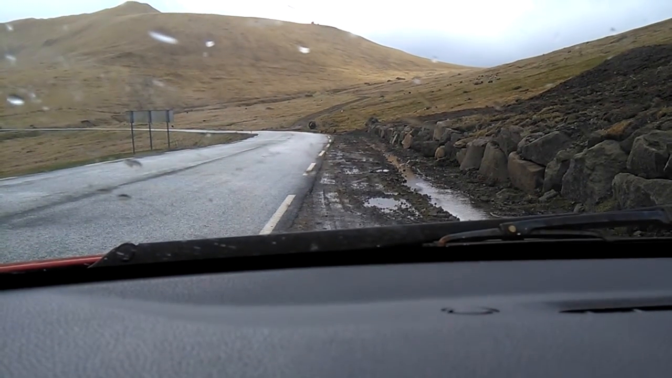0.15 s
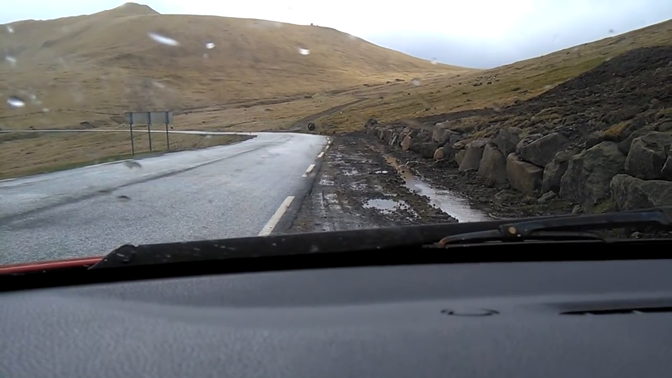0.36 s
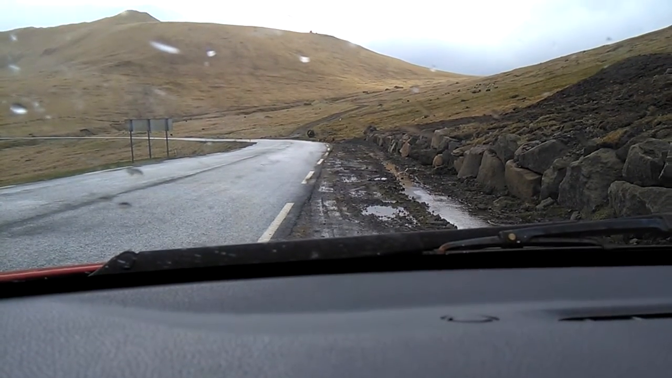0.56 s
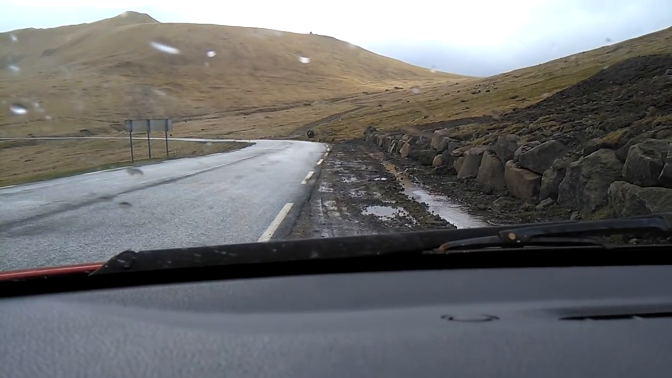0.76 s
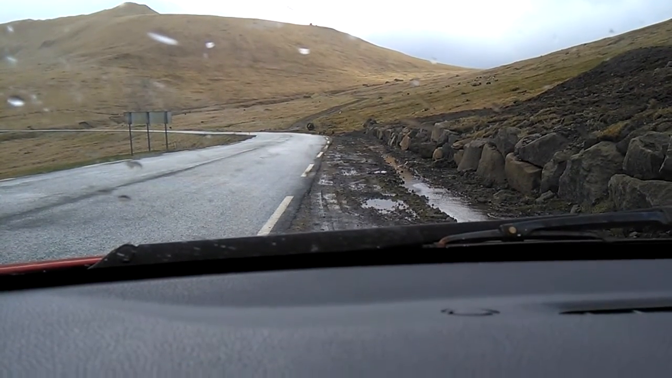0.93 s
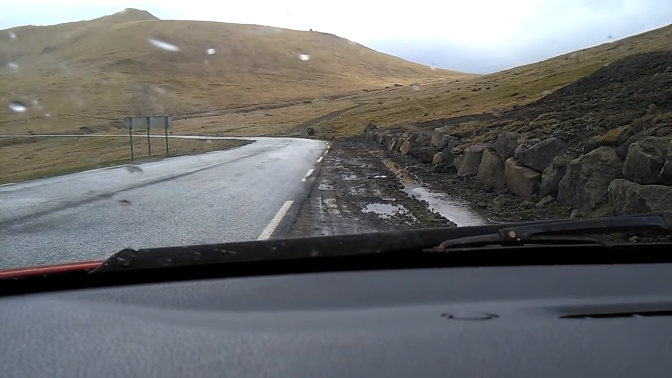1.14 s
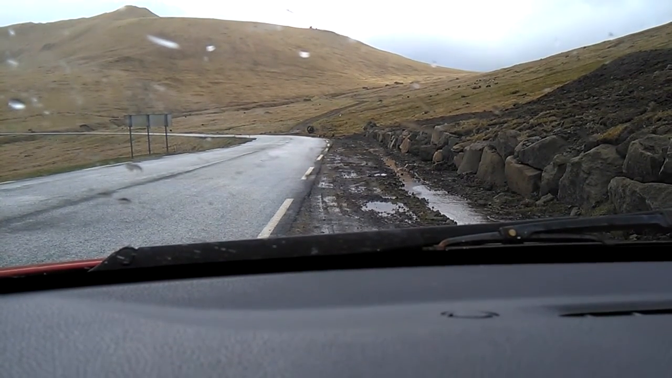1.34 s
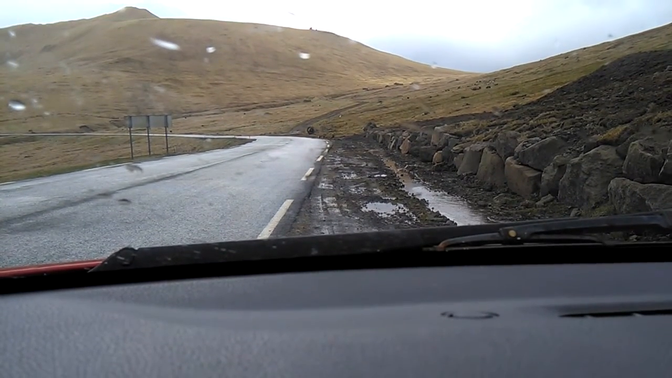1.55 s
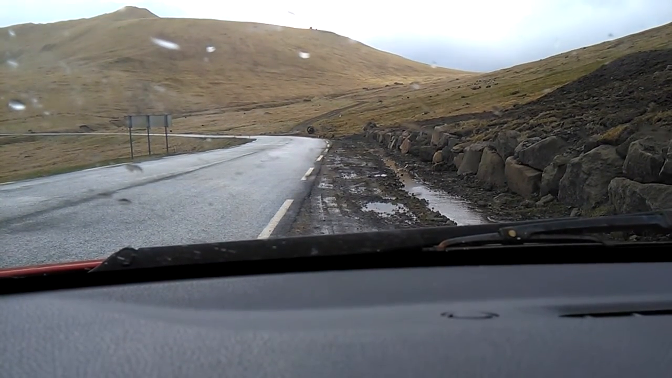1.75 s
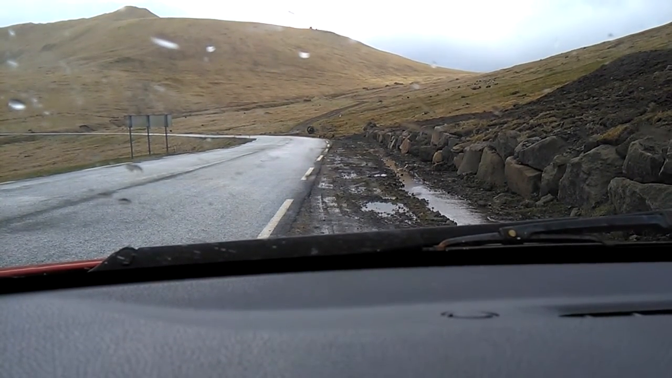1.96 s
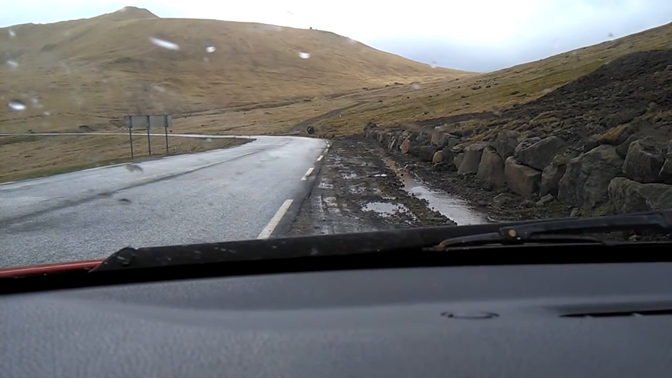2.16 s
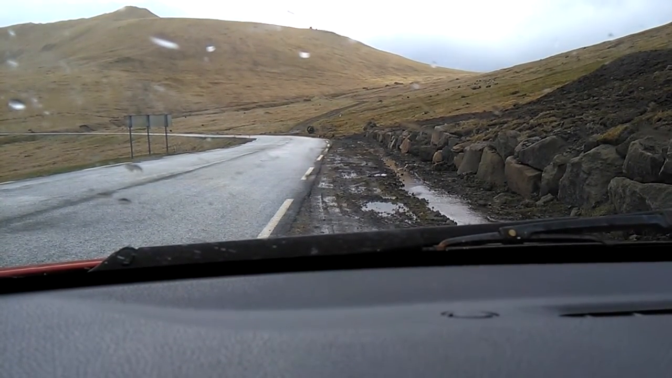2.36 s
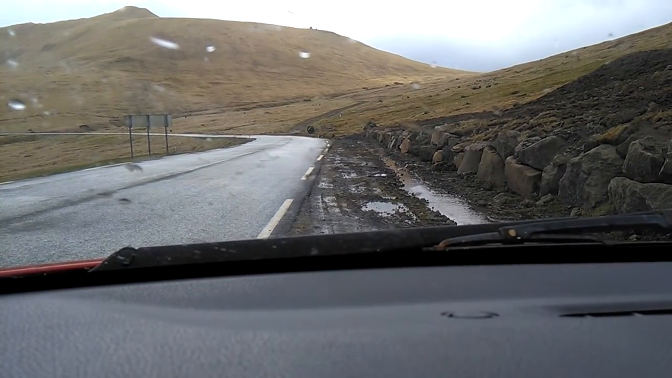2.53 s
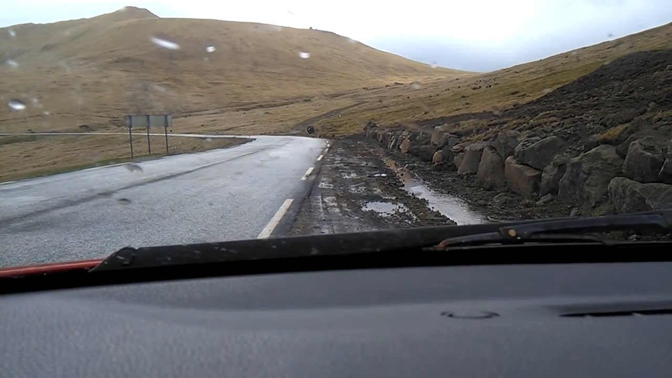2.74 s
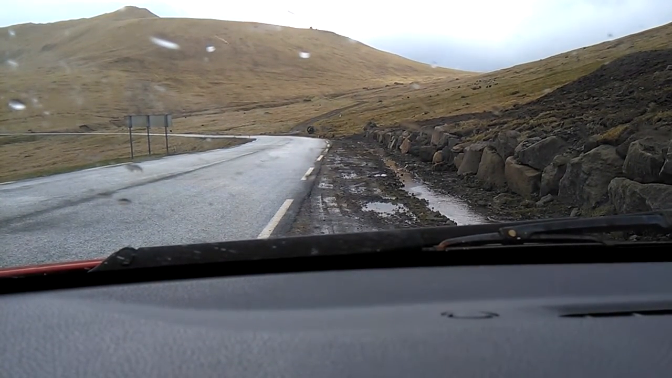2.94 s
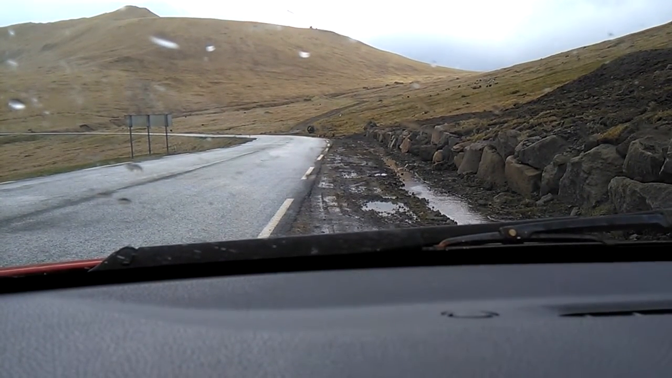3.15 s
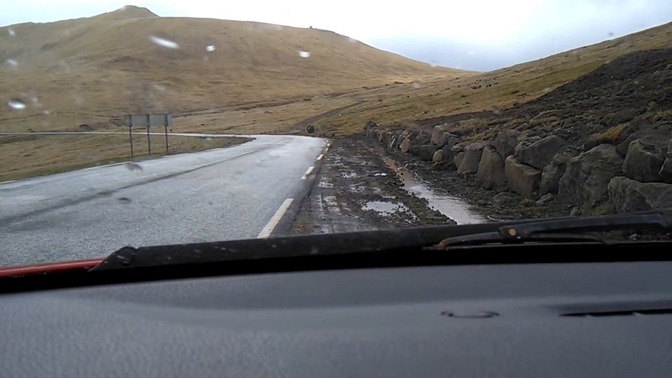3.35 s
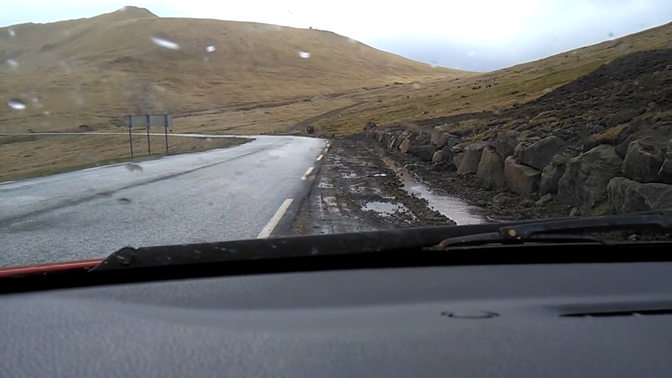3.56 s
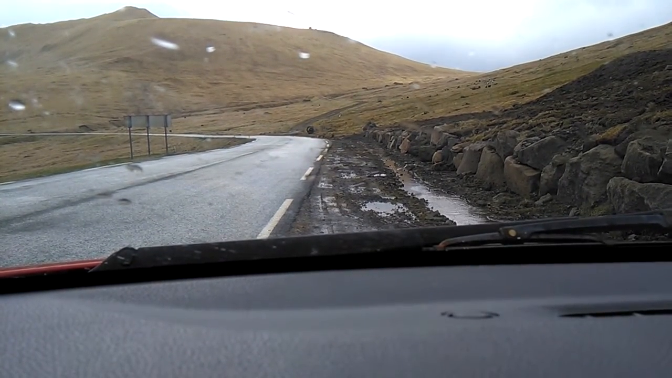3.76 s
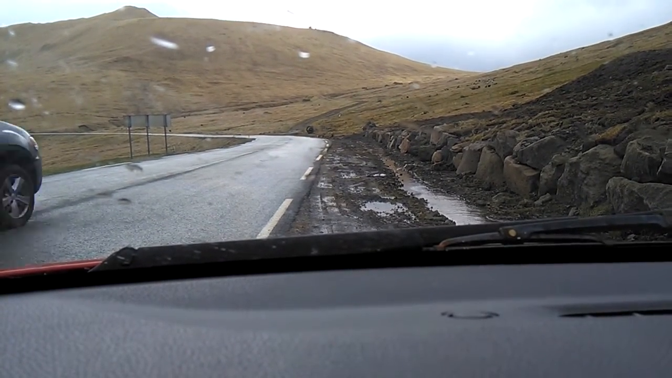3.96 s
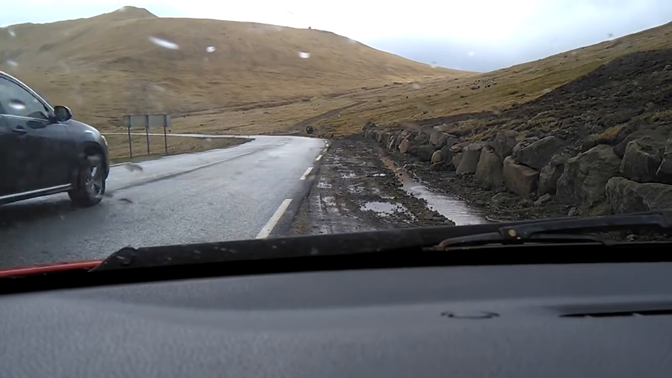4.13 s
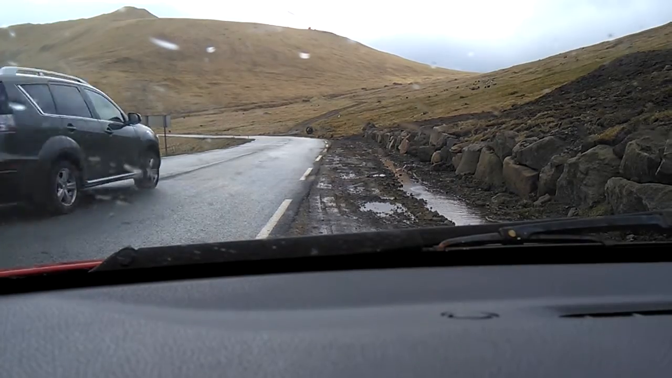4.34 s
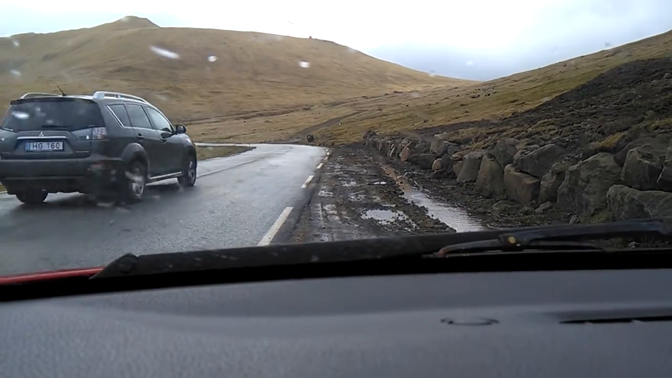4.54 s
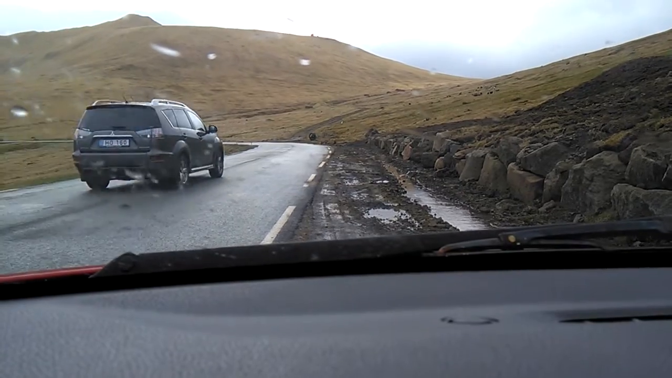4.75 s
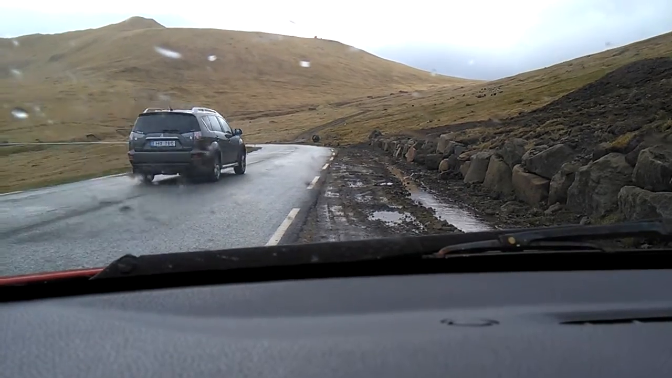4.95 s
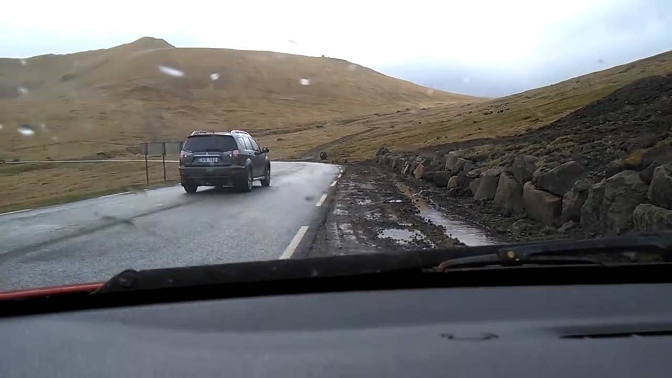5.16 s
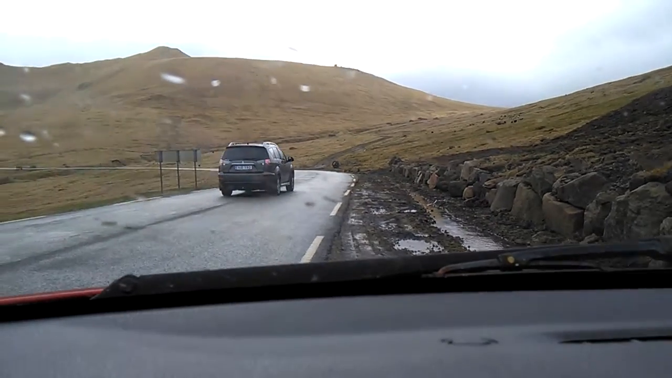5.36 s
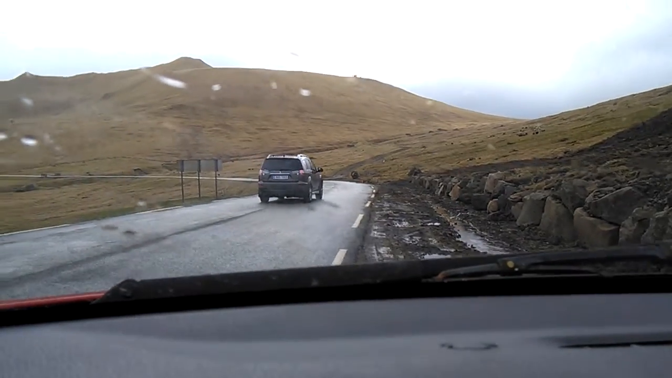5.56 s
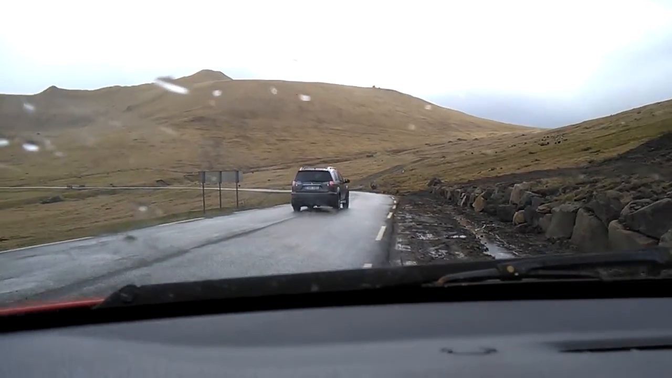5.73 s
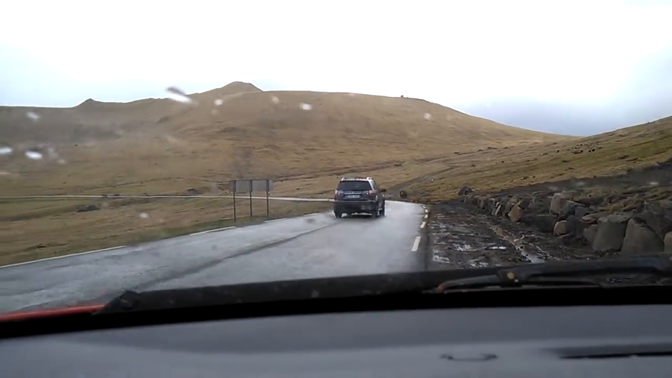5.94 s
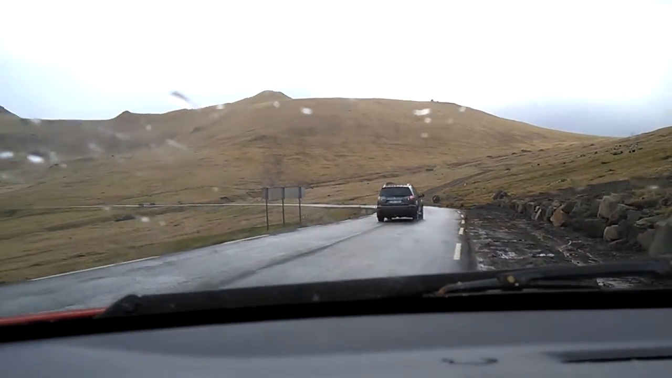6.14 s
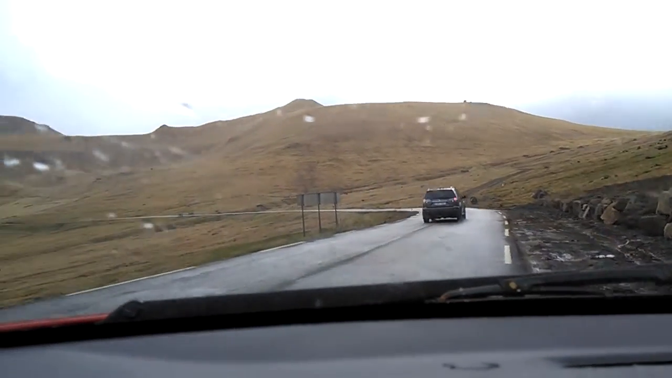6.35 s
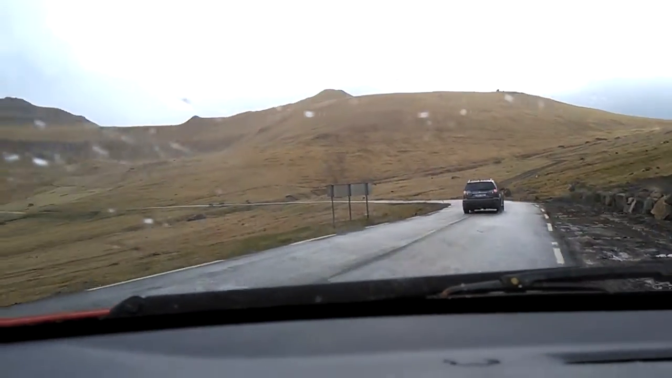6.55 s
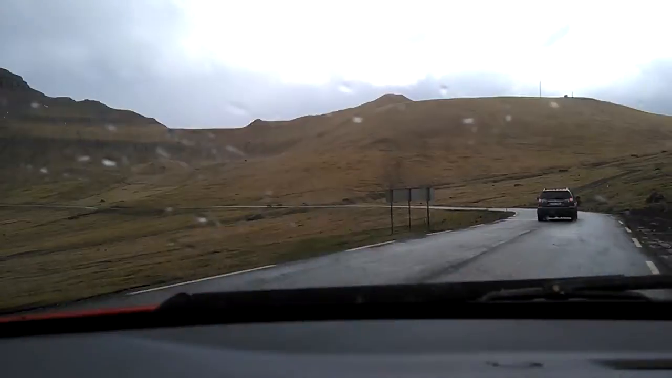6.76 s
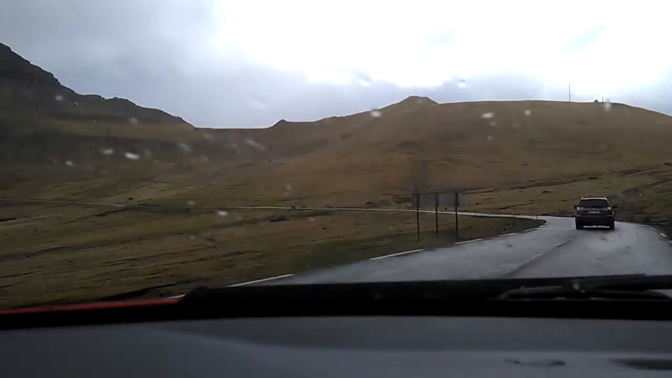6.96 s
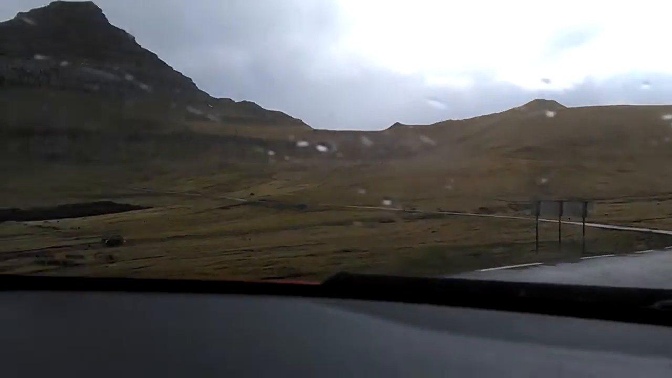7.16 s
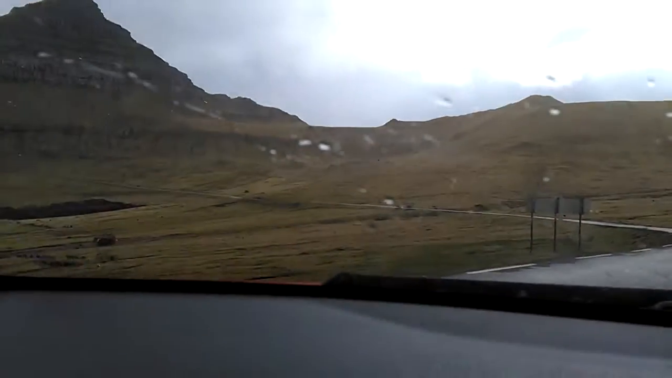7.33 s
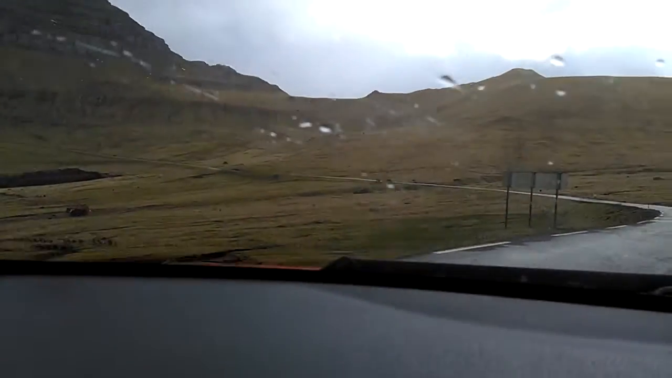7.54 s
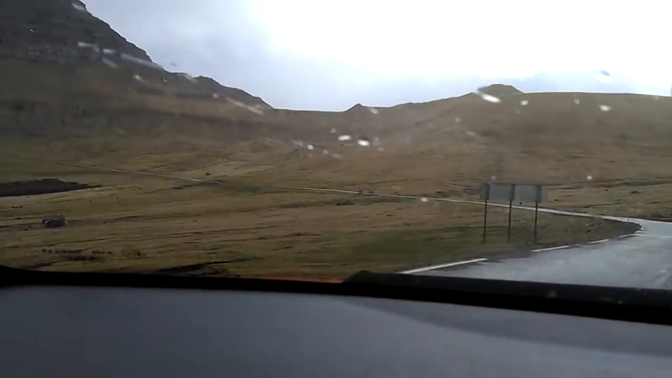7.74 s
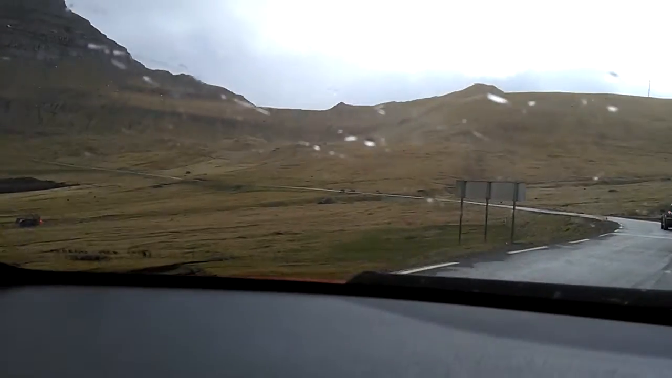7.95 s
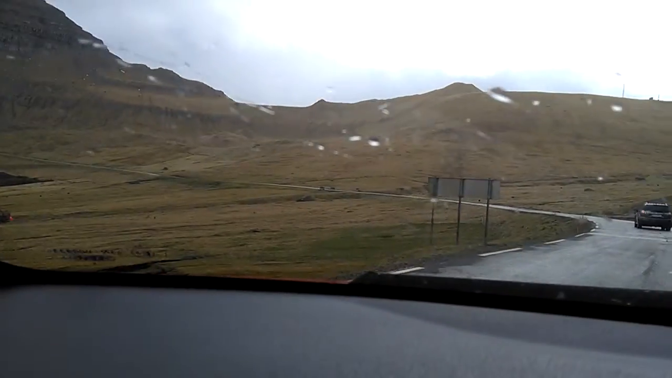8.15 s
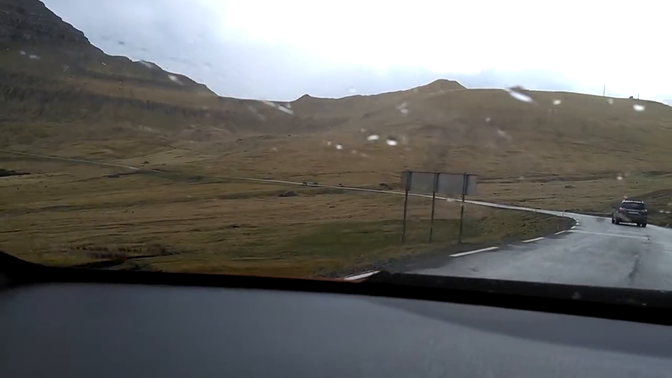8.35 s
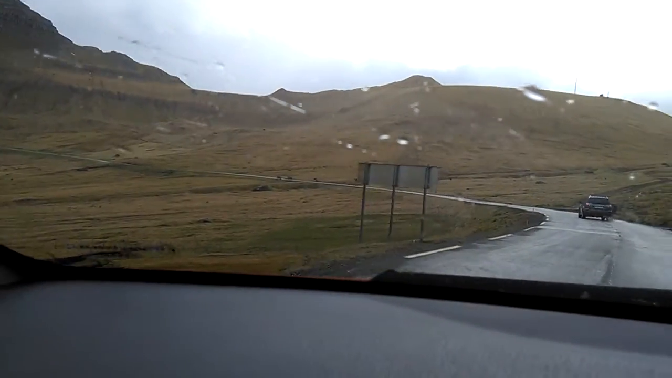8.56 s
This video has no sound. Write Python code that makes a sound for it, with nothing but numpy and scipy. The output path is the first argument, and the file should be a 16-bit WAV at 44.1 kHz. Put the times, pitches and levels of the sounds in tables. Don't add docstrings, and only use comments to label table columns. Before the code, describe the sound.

Heard inside a car by a small hand-held microphone: quiet low idle, soft fan air and an indicator alternating bright ticks and duller tocks. A few bumps and sleeve rustles come first, another car swishes softly past, then the engine deepens and the car pulls out. The ticking stops amid clicks and a hand rub; road rumble grows and a loose panel buzzes.

```python
import sys
import numpy as np
from scipy import signal
from scipy.fft import rfft, irfft
from scipy.io import wavfile
from scipy.ndimage import uniform_filter1d

SR = 44100
rng = np.random.default_rng(int(sys.argv[2]) if len(sys.argv) > 2 else 0)


def boost(x):
    u = np.asarray(x, float) / 20
    return 10 ** u


def generate_wav(sig):
    pcm = np.round(np.clip(np.atleast_2d(sig).T, -1, 1) * 32767).astype(np.int16)
    wavfile.write(sys.argv[1], SR, pcm)


N = 379260
T = np.arange(N) / SR
TOP_HZ = 14250
HEAVE_MID_DB = -36
BUZZ_HZ = 645.3

# time in seconds, firing rate in Hz, then levels in dB of the firing tone,
# of the overtones and of the rocking of the block.
ENGINE_STATE = [(.75, 39.02, -54, -64, -60), (1.2, 37.64, -52, -68, -62), (2.5, 38.9, -49, -67, -64),
                (4.2, 39.1, -62, -53, -63), (4.6, 53.13, -38, -48, -45), (4.8, 58.36, -32, -43, -37.5),
                (5.05, 59.2, -28.5, -43, -36.5), (5.27, 55.95, -24, -37, -37), (5.7, 46, -38, -58, -43),
                (5.95, 47.23, -25.5, -41, -38), (6.3, 49.05, -24.5, -48, -43), (6.8, 46.47, -28, -42, -40),
                (7.0, 47.74, -23, -38.5, -36), (7.13, 50.41, -23, -33.5, -44),
                (7.25, 53.04, -22.5, -31.5, -50), (7.6, 57.27, -27, -34.5, -54),
                (7.8, 60.9, -23.5, -49, -50), (8.15, 63.5, -32, -48.5, -51), (8.6, 69, -31, -45.5, -49)]
# time in seconds, suspension heave in dB, gravel under the tyres in dB.
DRIVING = [(0, -51.5, -54), (1, -48, -54), (2.5, -42.5, -48), (3.1, -45, -48), (4.2, -41, -47),
           (4.6, -38.5, -42), (5.3, -32, -39), (5.75, -35.5, -39.5), (6.2, -32.5, -38), (6.7, -28.5, -40),
           (7.2, -30, -41), (8, -28, -42.5), (8.4, -29, -38.5), (8.6, -29.5, -43)]
# time in seconds, peak in dB.
PANEL_KNOCKS = [(7.838, -42), (7.89, -45), (8.077, -33.5), (8.109, -43), (8.164, -36.5), (8.215, -45),
                (8.264, -42), (8.3, -41), (8.349, -36), (8.374, -34), (8.414, -36), (8.47, -40),
                (8.52, -44), (8.56, -43)]


def curves(table):
    s, *columns = np.transpose(table)
    return [np.interp(T, s, c) for c in columns]


def noise():
    return rng.standard_normal(N)


def unit(x):
    return x / np.sqrt(np.mean(x ** 2))


def colour(x, points, lo_hz, hi_hz, order=8):
    hz = np.fft.rfftfreq(len(x), 1 / SR) + 1
    f, db = np.transpose(points)
    edges = 1 / np.sqrt((1 + (lo_hz / hz) ** order) * (1 + (hz / hi_hz) ** order))
    shape = boost(np.interp(np.log(hz), np.log(f), db))
    return unit(irfft(rfft(x) * shape * edges, len(x)))


def band(x, hz, width):
    return signal.lfilter(*signal.iirpeak(hz, hz / width, fs=SR), x)


def steep(x, hz, width):
    return unit(band(band(x, hz, width), hz, width))


def grit(size, rough_db):
    catch = np.minimum(rng.exponential(size=size), 5)
    return rng.standard_normal(size) * boost(rough_db * catch)


def walk(rate):
    k = int(SR / rate)
    held = np.repeat(rng.standard_normal(N // k + 1), k)
    return unit(uniform_filter1d(uniform_filter1d(held, k), k)[:N])


def swells(s, db, rise, fall):
    t = T[::64, None] - s
    slope = np.where(t < 0, t / np.maximum(rise, .01), -t / np.maximum(fall, .01))
    power = np.sum(boost(2 * (db + 20 * slope)), axis=1)
    return np.interp(T, T[::64], np.sqrt(power))


def add(out, s, x):
    i = max(int(s * SR), 0)
    out[i:i + len(x)] += x[:len(out) - i]


def engine():
    orders = (2, 5, 6, 7, 8, 9, 10, 12, 15, 18, 21, 22)
    # level in dB of the matching partial, relative to the overtones.
    orders_db = [-8, -16, 1, -17, -14, -2, -15, -17, -21, -20, -20, -17]
    # frequency in Hz, lift of a partial crossing it in dB.
    door_lift = [(125, 0), (150, 5), (180, 8), (196, -2), (260, 0.5)]
    # time in seconds, peak in dB, rise and fall in seconds.
    whine_swells = [
        (7.79, -55, 0.11, 0.33),
        (7.94, -58, .3, .25),
        (8.28, -64, .4, 0.41),
        (8.58, -56, 0.092, .1),
        (8.13, -56.5, 0.084, 0.41),
        (8.4, -56, 0.18, 0.083),
        (8.52, -47.5, 0.041, .09),
    ]
    firing_hz, tone_db, over_db, rock_db = curves(ENGINE_STATE)
    shaft_hz = firing_hz / 3
    turn = 2 * np.pi * np.cumsum(shaft_hz * (1 + .0015 * walk(6))) / SR

    def partial(k, db):
        return boost(db + 1.1 * walk(5)) * np.sin(k * turn + rng.uniform(0, 6.4) + .3 * walk(4.6))

    def doors_db(k):
        return np.interp(k * shaft_hz, *np.transpose(door_lift))

    tone = boost(tone_db + 1.2 * walk(9)) * np.sin(3 * turn)
    over = boost(over_db) * sum(partial(k, db + doors_db(k)) for k, db in zip(orders, orders_db))
    rocking = partial(4, rock_db)
    idle = np.interp(firing_hz, (40, 44), (1, 0)) * (partial(7.5, -56) + partial(13.5, -54))

    strain = np.clip((firing_hz - 36) / 24, 0, 1)
    whine_db = np.interp(firing_hz, (39.5, 41), (-62.5, -80))
    size = boost(whine_db) + swells(*np.transpose(whine_swells))
    whine = size * boost((1.5 + strain) * walk(14)) * np.sin(45 * turn + (.2 + .6 * strain) * walk(30))
    return np.sqrt(2) * (tone + over + rocking + idle + whine)


def jolts(hz):
    # time in seconds, peak in dB, centre in Hz, dying away in seconds.
    jolt_rows = [(.01, -38, 100.3, 0.11), (.26, -36.5, 60, 0.14), (.58, -35, 110, 0.087),
                 (.72, -35.5, 60, .15), (.6, -31.5, 170, 0.11), (1.66, -41, 60, 0.13),
                 (1.67, -37, 164, 0.3), (1.8, -32, 149, 0.043), (2.3, -38.5, 165, 0.25),
                 (2.56, -45, 144, 0.37), (2.8, -33.5, 165, 0.16), (3.28, -30.5, 180, 0.048),
                 (3.33, -28, 70.3, 0.36), (3.69, -37.5, 95, 0.086), (3.83, -27, 48.3, 0.18),
                 (4.12, -32.5, 55, 0.18), (4.3, -35.5, 147, 0.46), (4.7, -30.5, 55, 0.21),
                 (5, -36, 40.04, .3), (4.92, -33, 185, 0.19), (6.36, -37.5, 270, .15), (5.3, -27, 70, 0.2),
                 (5.56, -25.5, 55.06, 0.17), (5.861, -28.5, 164.6, 0.14), (6.18, -33, 164.7, 0.27),
                 (6.47, -34, 128.9, 0.17), (6.65, -34, 30, 0.15), (6.87, -24.5, 95, 0.099),
                 (7.05, -18, 55, 0.23), (7.15, -28, 150, 0.24), (6.4, -34, 150, 0.17),
                 (8.15, -40, 342, 0.14), (8.38, -30.5, 165, 0.37)]
    s, db, centre_hz, dies = np.transpose(jolt_rows)
    octaves_off = np.log2(centre_hz / hz)
    return swells(s, db - 10 * (octaves_off / 0.57) ** 2, 0.72 * dies, dies)


def body():
    # frequency in Hz, level in dB per Hz.
    cabin = [(12, -54), (20, -16), (29, -41), (43, 1.5), (65, -4.5), (122, -13), (171, -4.5), (209, -12),
             (278, -18.5), (334, -20), (460, -23), (572, -24.5), (736, -29.5), (827, -26), (1100, -29),
             (1430, -74), (2420, -120)]
    # offset in dB, slope in dB per dB of heave, centre in Hz.
    panel_groups = [
        (3, 1, 54.4),
        (-5, 1.05, 101.6),
        (-4.5, 0.15, 152),
    ]
    # frequency and width in Hz, dB relative to trim shaking.
    ridge_modes = [(233.8, 26.7, -8.5), (345, 30, -11.5), (400, 34, -14)]
    # time in seconds, peak in dB, rise and fall in seconds.
    passing = [
        (2.55, -58, .9, .8),
        (4.53, -49.5, 0.2, 0.4),
    ]
    heave_db, gravel_db = curves(DRIVING)
    flutter_db = 1.7

    def shaking(offset_db, slope, hz):
        steady = boost(HEAVE_MID_DB + offset_db + slope * (heave_db - HEAVE_MID_DB))
        return np.hypot(steady, jolts(hz))

    boom, pan, doors = (shaking(*row) for row in panel_groups)
    tone = boost(curves(ENGINE_STATE)[1] + 2.5)
    boom = np.sqrt(np.maximum(boom ** 2 - tone ** 2, (boom * boost(-11)) ** 2))
    boom = boom * boost(flutter_db * walk(12)) * colour(noise(), cabin, 49.4, 65)
    pan = pan * boost(4.5 + flutter_db * walk(19)) * colour(noise(), cabin, 72.7, 112.0)
    doors = doors * boost(-1.5 + flutter_db * walk(12)) * colour(noise(), cabin, 135, 186, order=12)

    ridges = sum(boost(db + 1.3 * walk(4.01)) * steep(noise(), hz, width) for hz, width, db in ridge_modes)
    trim_level = np.hypot(boost(gravel_db), jolts(292)) * boost(3.0 + flutter_db * walk(14))
    trim = trim_level * (boost(-2.0) * colour(noise(), cabin, 209.0, 423) + ridges)
    sway = boost(heave_db - 17.5 + 3.3 * walk(3.5)) * steep(noise(), 30, 12)

    road = np.hypot(boost(-56 + 0.15 * (gravel_db + 41.0)), swells(*np.transpose(passing)))
    road = road * boost(flutter_db * walk(14)) * colour(noise(), cabin, 526, 900)
    return boom + pan + doors + trim + sway + road


def ring(modes, rise, crest, stop):
    t = np.arange(2600) / SR
    choke = boost(-17 * np.clip((t - stop) / .012, 0, 1) - 110 * np.maximum(t - stop, 0))
    late = np.maximum(t - crest, 0)
    tones = sum(boost(db - 60 * late / t60) * np.cos(2 * np.pi * hz * (t - crest)) for hz, db, t60 in modes)
    return np.sin(np.pi / 2 * np.clip(t / rise / 1.14, 0, 1)) ** 2 * choke * tones


def vary(modes, loose=1):
    chance = rng.standard_normal((len(modes), 2))
    return [(hz * (1 + loose * .0015 * a), db + 1.2 * b, t60)
            for (hz, db, t60), (a, b) in zip(modes, chance)]


def indicator():
    ticks = [.069, .759, 1.439, 2.129, 2.8094, 3.4991, 4.189, 4.869, 5.5591, 6.239]
    tocks = [.4036, 1.0906, 1.7767, 2.463, 3.1499, 3.8353, 4.5223, 5.2077, 5.8946, 6.58]
    tock_lags = [.004, .006, 0, .0055, .007, .002, .005, 0, .002, .007]
    # frequency in Hz, level in dB, t60 in seconds.
    tick_modes = [(2104, -58, .3), (2207, -36.5, .068), (2272, -44.5, .5), (2367, -46, .23),
                  (2479, -47, .5), (2520, -49.5, .5), (2665, -55, .036), (1625, -60, .3), (1754, -64, .03)]
    # frequency in Hz, level in dB, t60 in seconds.
    tock_modes = [(2194, -54.5, .1), (2254, -52, 0.16), (2336, -55, 0.11), (2490, -57.5, 0.12),
                  (2600, -55.5, 0.087)]
    coil_modes = [(2780, -55, 0.054), (1280, -48.5, 0.055)]  # Hz, dB, t60 s, as in the next two
    frame_modes = [(1616, -55, 0.11), (1756, -56, 0.064), (2890, -58.5, 0.037), (4290, -74, 0.028)]
    knock_modes = [(1289, -45.5, 0.067), (1214, -50.5, 0.086), (1416, -52.0, 0.085), (1610, -61, 0.05)]
    out = np.zeros(N)
    fade = np.exp(-np.arange(1800) / SR / 0.022)

    def burst():
        return rng.standard_normal(1800)

    for s in ticks:
        tick = ring(vary(tick_modes), .002, .0059, .02)
        rounded = band(.04 * np.tanh(tick / .04), 2300, 1800)
        add(out, s - .0034, steep(rounded, 2300, 1800) * .95 * np.std(tick))
        add(out, s - .0075, ring(vary(coil_modes), 0.0025, 0.00196, 0.005))
        add(out, s - .009, boost(-61.5) * fade * steep(burst(), 8300, 2700))
        add(out, s - .002, ring(vary(frame_modes, 6.6), 0.005, .008, 0.042))
        add(out, s - .009, boost(-73) * fade ** 2 * steep(burst(), 13000, 3000))
        add(out, s + .004, boost(-48.5) * fade * band(burst(), 1960, 720))
    for s, lag in zip(tocks, tock_lags):
        knock = ring(vary(knock_modes, 5), 0.0018, 0.00462, 0.041)
        add(out, s - .0025, knock)
        add(out, s + .002, boost(-47) * fade * band(band(burst(), 1500, 1000), 1500, 1000))
        add(out, s + .0065, boost(-12) * knock)
        add(out, s + .0012, ring(vary([(2830, -55, 0.06)], 5), 0.0013, .004, 0.012))
        add(out, s + lag, ring(vary(tock_modes, 5), 0.002, 0.004, 0.024))
        add(out, s + lag, boost(-43.0) * fade * band(band(burst(), 2100, 800), 2100, 800))
    return out


def knocks():
    # time in seconds, peak in dB, centre in Hz,
    # low part in dB, top part in dB.
    clicks = [(0.4985, -57, 3880, 6, 0), (3.34, -56, 2420, -9, -5), (5.86, -74, 2080, 12, 13),
              (6.1872, -43, 4000, -28, -3), (6.451, -54, 3900, -10, -3), (6.4575, -44, 3780, -15, 2.5),
              (6.559, -43, 4007, -17, -10), (6.616, -41, 3000, 6.5, 7.5), (6.6453, -48, 2840, 0, 8.5),
              (6.66, -46.5, 4760, 5, 4), (7.1107, -66, 2060, 11, -7), (7.1792, -58.5, 2035, 16, 10),
              (7.221, -51, 2733, 5, 6.5), (7.677, -43, 2840, -16, -14), (7.761, -38.5, 2680, 1, -10),
              (8.0027, -52.5, 2600, 1, -17), (8.5147, -42, 2350, -18, -7.5)]
    # time in seconds, peak in dB, frequency in Hz, t60 in seconds.
    thumps = [(.4965, -20.5, 280, 0.045), (.4975, -22.5, 471, 0.041), (0.512, -12.5, 58, 0.33),
              (.487, -18.5, 138, 0.127), (0.48, -22.5, 100.5, 0.31), (0.37, -47, 560, 0.045),
              (4.22, -36, 31, .5), (7.679, -29, 434, 0.056), (6.617, -22.5, 250, 0.13),
              (3.67, -34, 474, 0.093), (.5, -22, 229.5, 0.13), (1.985, -37, 646, 0.092),
              (2.405, -22.5, 190, 0.057), (3.29, -22, 98.3, 0.38), (3.679, -19, 120, 0.081),
              (6.611, -22, 375, 0.16), (6.641, -20, 425, 0.06), (6.652, -25, 396, 0.055),
              (6.672, -25.5, 433, 0.076), (6.76, -30, 420, 0.086), (6.44, -31.5, 430, 0.089),
              (8.11, -32.5, 350, 0.22), (8.24, -32, 350, .2), (8.35, -31, 335, .15), (7.124, -24, 150, .2),
              (7.107, -30, 670, 0.027), (7.13, -42, 510, .06), (7.2, -32, 550, 0.071),
              (7.186, -38, 820, .05), (6.5, -41, 700, 0.05), (7.29, -38, 340, .06), (7.762, -40, 888, 0.14),
              (8.522, -41.5, 513.6, 0.65)]
    # time in seconds, peak in dB, frequency in Hz, t60 in seconds.
    pings = [(.4985, -57, 12000, .03), (3.341, -54, 11500, .02), (3.342, -57, 13200, .02),
             (.316, -55, 1002, 0.036), (.4983, -60, 3970, 0.046), (3.09, -59, 4500, 0.072),
             (3.341, -55, 2400, .03), (3.3425, -61, 4020, .02), (6.461, -47, 3750, .06),
             (6.458, -46, 7020, 0.029), (6.468, -48, 3900, 0.094), (6.56, -39, 5130, 0.028),
             (6.566, -50, 3900, 0.071), (6.6173, -35, 1500, 0.03), (6.6175, -36, 4900, 0.022),
             (6.618, -43, 2624, 0.07), (6.6185, -44, 7210, .03), (6.631, -41, 1040, .06),
             (6.6458, -43, 1400, .06), (6.646, -41, 6330, .02), (6.661, -43, 1510, .05),
             (6.691, -47, 1440, .04), (7.168, -46, 1050, .04), (7.1805, -35, 1170, 0.045),
             (7.3766, -48, 1050, .04), (7.108, -35, 1000, .025), (7.678, -45, 2950, .035),
             (7.678, -51, 4500, 0.036), (7.688, -51, 2794, .035), (7.697, -53, 2890, 0.079),
             (7.7617, -36.5, 2600, .06), (7.762, -45, 870, .09), (7.762, -44, 4540, .05),
             (7.763, -44, 1560, .08), (7.764, -45, 7560, 0.043), (7.769, -43, 3770, .04),
             (7.777, -49, 2650, .05), (8.515, -38, 2490, 0.037), (8.516, -48, 2060, .06),
             (8.522, -41.5, 2600, .05), (8.526, -49, 3010, .06), (8.516, -54, 7300, .04)]
    out = np.zeros(N)
    t = np.arange(12000) / SR
    click_t = t[:6000]
    for s, db, hz, low_db, top_db in clicks:
        rough = grit((4, 6000), 2.)
        scrape = steep(rough[0], hz, 0.34 * hz)
        scrape = scrape + boost(low_db) * steep(rough[1], 1540, 1160)
        scrape = scrape + boost(top_db) * steep(rough[2], 7300, 4500)
        scrape = scrape + boost(-11.5) * steep(rough[3], 1.59 * hz, 900)
        add(out, s, boost(db - 4 - 60 * click_t / 0.12) * np.clip(click_t / .003, 0, 1) * scrape)

    buzzes = [(s, db - 3.45, BUZZ_HZ * (1 + 0.013 * rng.standard_normal()), .14) for s, db in PANEL_KNOCKS]
    # its events, cycles to swell, roughness in dB
    for events, swell_cycles, rough_db in ((thumps, 2, 0), (buzzes, 9, 0), (pings, 5, 3)):
        for s, db, hz, t60 in events:
            uneven_db = rough_db * np.interp(t * hz / 5, np.arange(400), rng.standard_normal(400))
            level = boost(db + uneven_db - 60 * t / t60) * np.clip(t * hz / swell_cycles, 0, 1)
            add(out, s, level * np.sin(2 * np.pi * hz * t))
    return out


def rattle():
    s, db = np.transpose(PANEL_KNOCKS)
    return swells(s + 0.015, db - 8.5, 0.064, 0.076) * steep(grit(N, 1.7), BUZZ_HZ, 38)


def scuff():
    # time in seconds, peak in dB, rise and fall in seconds.
    drags = [
        (6.84, -58, .06, .6),
        (7.02, -70, .4, .06),
        (7.19, -45.5, 0.055, 0.17),
        (7.23, -46, .08, 0.081),
        (7.265, -49, 0.046, 0.049),
        (7.109, -51, .01, .02),
        (7.9, -60, 0.057, 0.089),
        (6.63, -48.5, 0.023, 0.087),
        (7.766, -55, 0.011, 0.11),
    ]
    rough = grit(N, 3.0)
    dash = steep(rough, 960, 370) + boost(3.0) * steep(rough, 690, 430) + boost(-9.0) * steep(rough, 2030, 1600)
    return swells(*np.transpose(drags)) * boost(2.5 * walk(60)) * dash


def cloth():
    # time in seconds, hiss in dB, coarser rub in dB, rise and fall in seconds.
    strokes = [(.07, -61.5, -71, 0.42, 0.3), (.5, -69.5, -72, 0.066, 0.43), (2.83, -64, -68, .03, .15),
               (2.97, -56.5, -62, 0.21, 0.19), (3.22, -58.5, -63, 0.45, 0.16),
               (3.343, -52.5, -68, 0.0078, 0.012), (3.351, -55, -70, 0.01, 0.025),
               (3.57, -59, -63.5, 0.44, .17), (3.78, -62, -69.5, 0.41, 0.47), (4.96, -65, -77, 0.36, 0.31),
               (6.01, -62, -67, 0.099, .4), (6.18, -50.5, -59, 0.34, 0.33), (6.36, -60.5, -59, 0.44, 0.21),
               (6.47, -54, -52, 0.039, 0.073), (6.56, -55.5, -60, 0.074, 0.12),
               (6.64, -58, -52, 0.14, 0.064), (6.75, -59, -61.5, 0.25, 0.36), (6.89, -55, -63, 0.24, 0.059),
               (7.02, -57.5, -63, 0.17, 0.17), (7.23, -50, -54, 0.25, 0.094), (7.4, -54, -59, 0.18, 0.13),
               (7.62, -57, -64, 0.58, 0.25), (7.76, -60, -55.5, 0.08, 0.27), (4.26, -69, -80, .05, 0.046),
               (4.75, -66.5, -76, 0.088, .1), (5.1, -67, -78, .1, .1), (8.035, -63, -72, .04, .04),
               (8.14, -63, -74, .03, .07), (8.36, -61, -73, .04, .04), (8.459, -60.5, -77, 0.043, 0.027),
               (8.53, -68, -58, 0.077, 0.078)]
    # frequency in Hz, level in dB per Hz.
    hiss_shape = [(2650, -23), (4500, -6), (5560, -9), (6930, -1), (8570, 2), (13500, -16.5), (14200, -13)]
    # frequency in Hz, level in dB per Hz.
    rub_shape = [(290, -39), (500, -7), (959, -1.5), (1110, -33), (1350, -13), (1610, -17), (2220, -7),
                 (7000, -20), (9100, -64), (15400, -120)]
    s, hiss_db, rub_db, rise, fall = np.transpose(strokes)
    patchy = .6 * walk(20)
    hiss = boost(patchy + 1.3 * walk(35)) * colour(grit(N, 1.8), hiss_shape, 5000, TOP_HZ)
    rub = boost(patchy + walk(60)) * colour(grit(N, 2.5), rub_shape, 900, 6000)

    tremble_db = 0.47 * (curves(DRIVING)[0] - HEAVE_MID_DB)
    finest = signal.sosfilt(signal.butter(4, 5500, "high", fs=SR, output="sos"), hiss)
    dullest = signal.sosfilt(signal.butter(4, 3800, "low", fs=SR, output="sos"), rub)
    rest = boost(-73.5 + tremble_db) * finest + boost(-79 + tremble_db) * dullest
    return rest + swells(s, hiss_db, rise, fall) * hiss + swells(s, rub_db, rise, fall) * rub


def fan():
    # frequency in Hz, level in dB per Hz.
    air_shape = [(590, -45), (1000, -2.5), (1290, -9.5), (1680, -11), (1970, -17.5), (2150, -15),
                 (2380, -17), (2510, -13.5), (2780, -25), (3320, -23), (4300, -36), (5340, -50),
                 (10400, -52), (14200, -33)]
    # time in seconds, level in dB.
    vent = [(0, -83), (3.9, -83), (4.3, -92), (8.6, -93)]
    # frequency in Hz, width in Hz, level in dB.
    duct_modes = [(634.3, 22, -59), (689, 33, -67), (1015, 52, -64.5), (1538, 75, -73.5), (1955, 67, -74),
                  (2773, 60, -76), (3750, 87, -85)]
    air = boost(-64.5 + 0.41 * walk(14)) * colour(noise(), air_shape, 1080, 14400)
    whistle = boost(curves(vent)[0] + 1.4 * walk(6)) * steep(noise(), 4400, 1500)
    duct = sum(boost(db + 2.0 * walk(3.77)) * unit(band(noise(), hz, width)) for hz, width, db in duct_modes)
    return air + whistle + duct


def scene():
    driving = engine() + body()
    strikes = indicator() + knocks() + rattle()
    return (driving + strikes + scuff() + cloth() + fan())[None]


def low_pass(x):
    return signal.sosfilt(signal.butter(12, 14280, fs=SR, output="sos"), x)


def record(dry):
    ceiling = .3
    mix = signal.sosfilt(signal.butter(2, 26, "high", fs=SR, output="sos"), dry)
    mix = ceiling * np.tanh(mix / ceiling)
    mix = mix * np.clip(T / .003, 0, 1) * np.clip((T[-1] - T) / .012, .3, 1)
    mix = signal.sosfilt(signal.ellip(10, .2, 60, TOP_HZ, fs=SR, output="sos"), mix)
    return low_pass(mix)


dry = scene()
out = record(dry)
generate_wav(out)
```